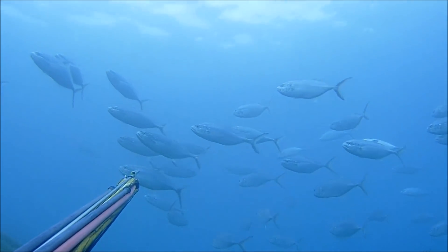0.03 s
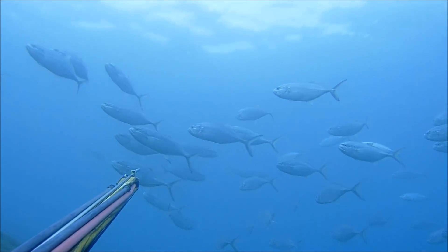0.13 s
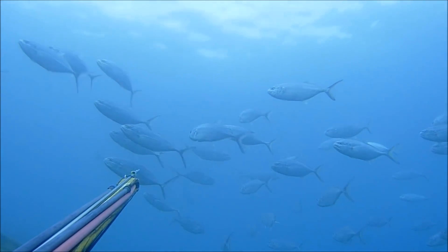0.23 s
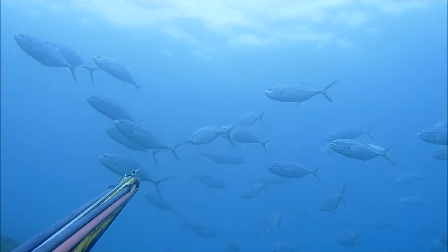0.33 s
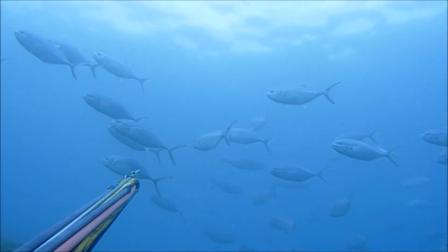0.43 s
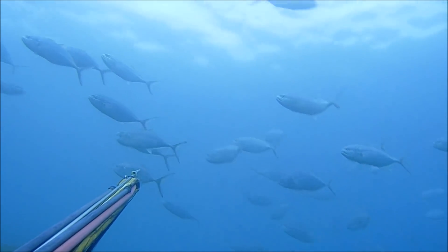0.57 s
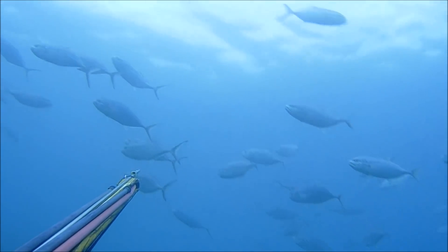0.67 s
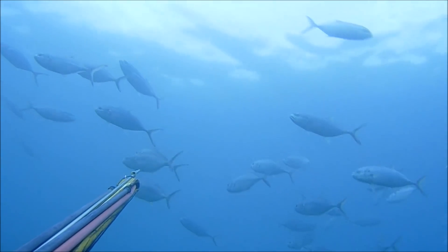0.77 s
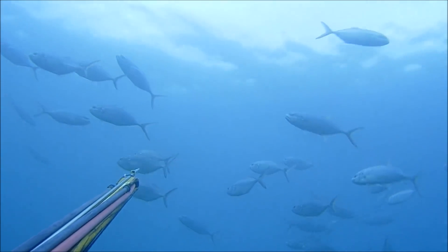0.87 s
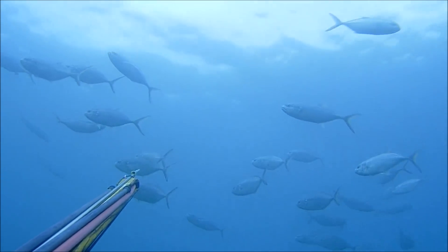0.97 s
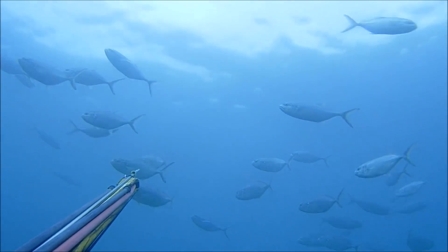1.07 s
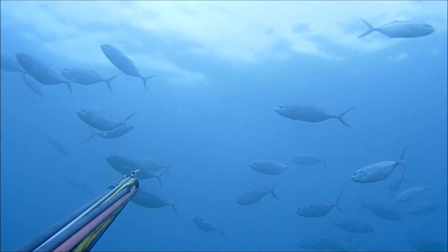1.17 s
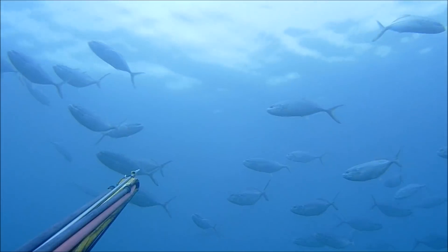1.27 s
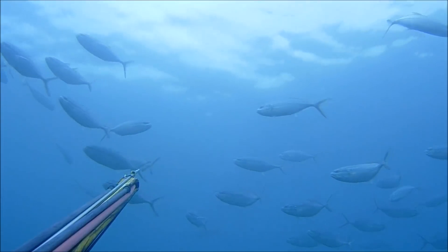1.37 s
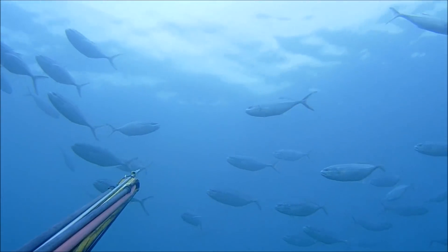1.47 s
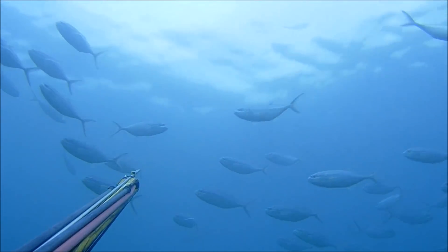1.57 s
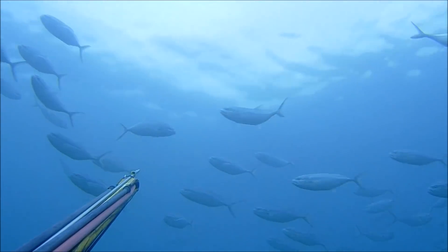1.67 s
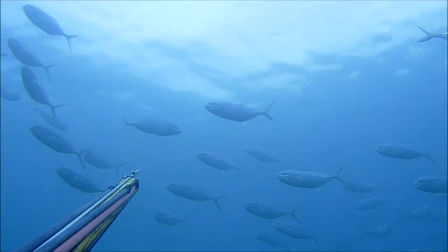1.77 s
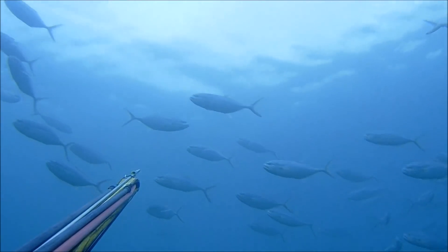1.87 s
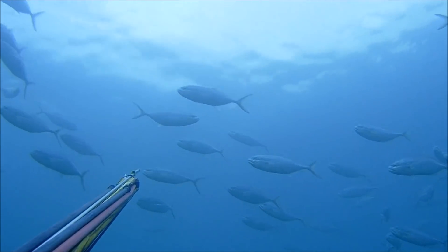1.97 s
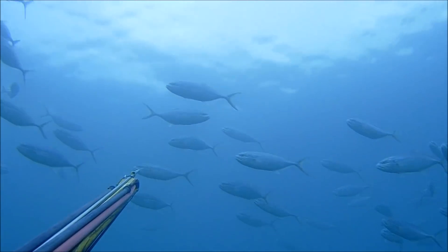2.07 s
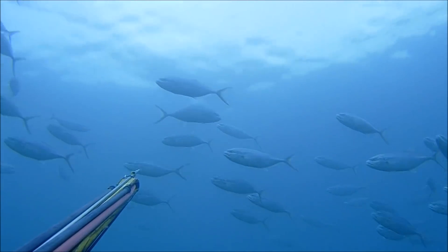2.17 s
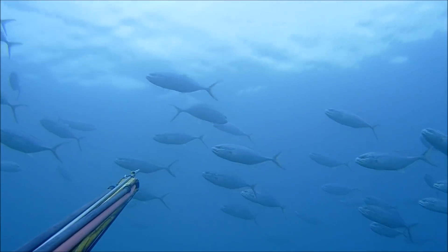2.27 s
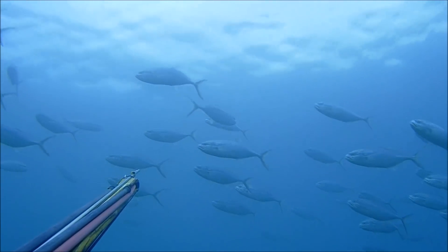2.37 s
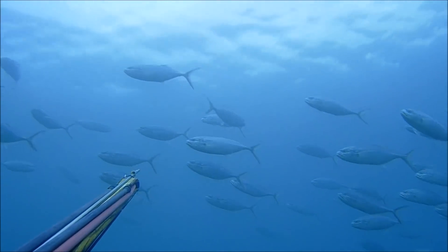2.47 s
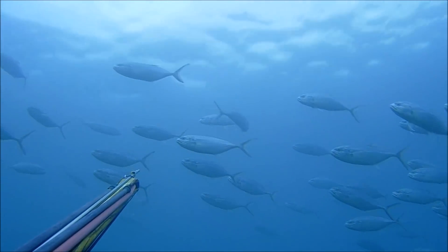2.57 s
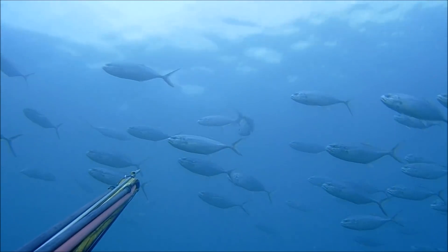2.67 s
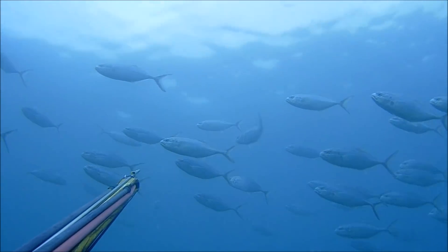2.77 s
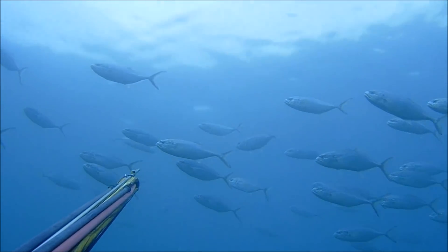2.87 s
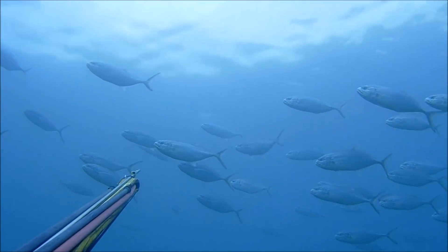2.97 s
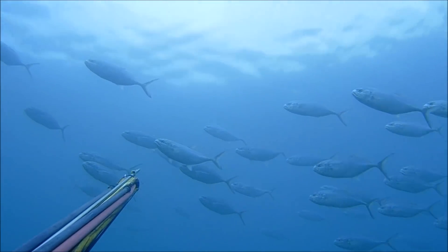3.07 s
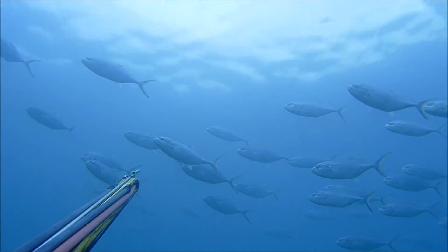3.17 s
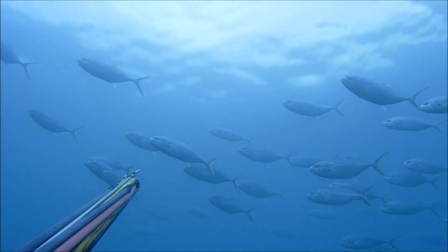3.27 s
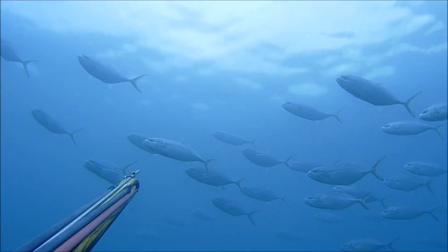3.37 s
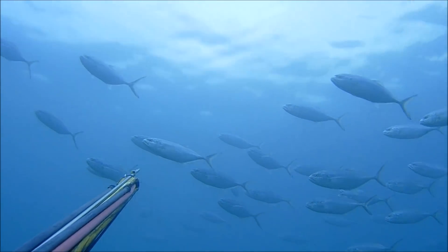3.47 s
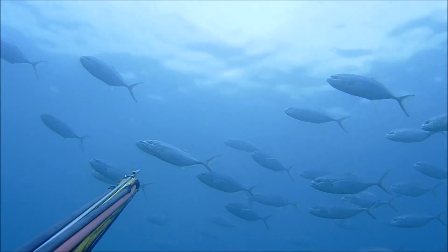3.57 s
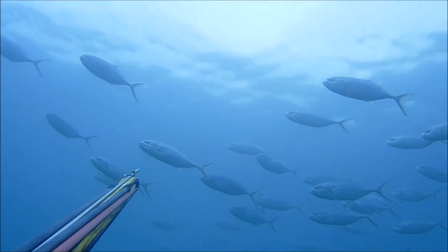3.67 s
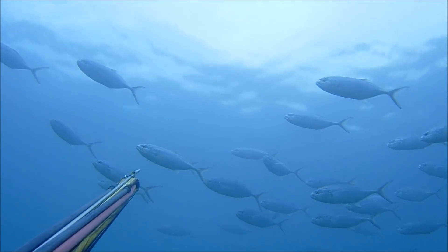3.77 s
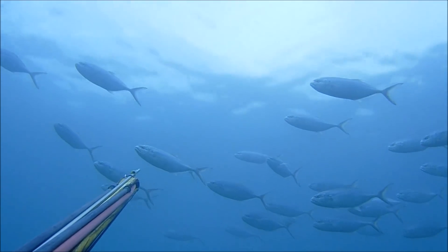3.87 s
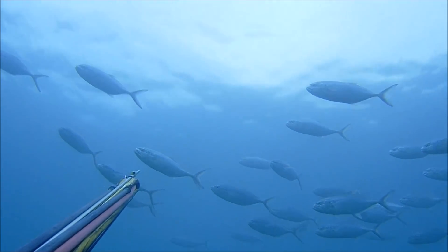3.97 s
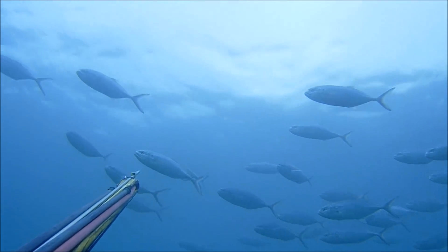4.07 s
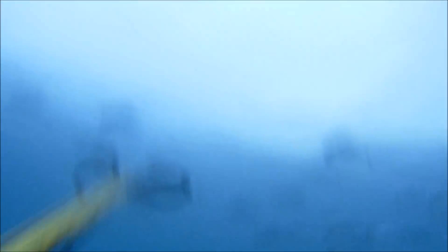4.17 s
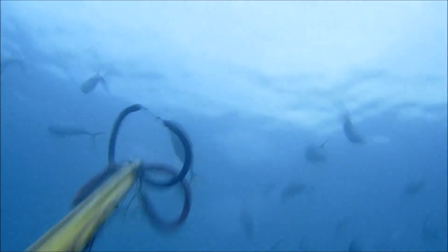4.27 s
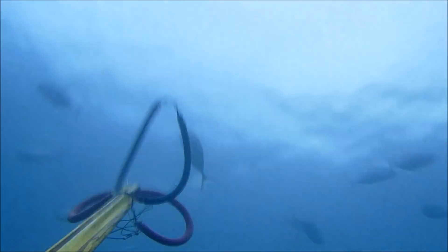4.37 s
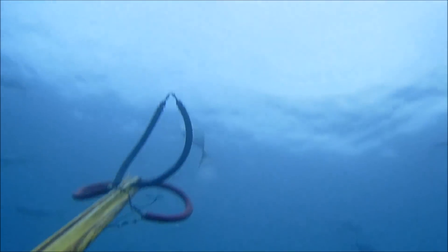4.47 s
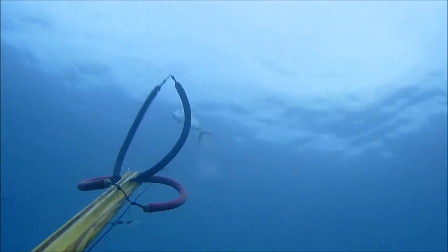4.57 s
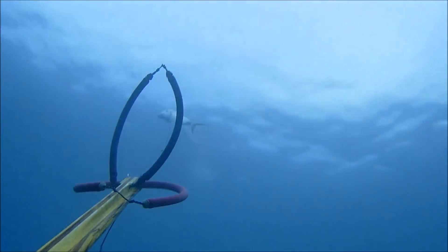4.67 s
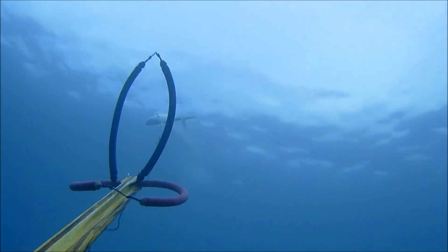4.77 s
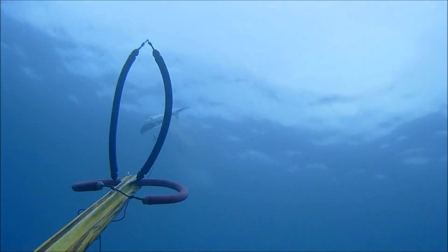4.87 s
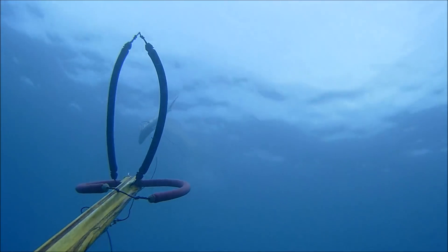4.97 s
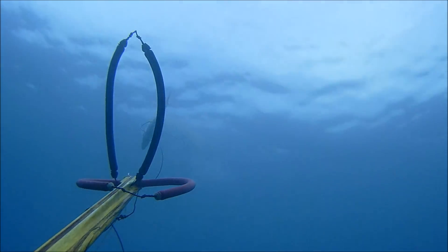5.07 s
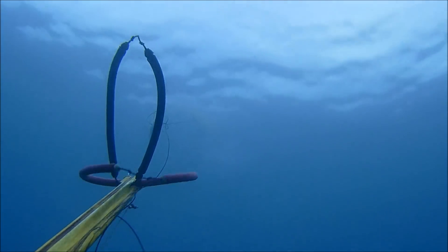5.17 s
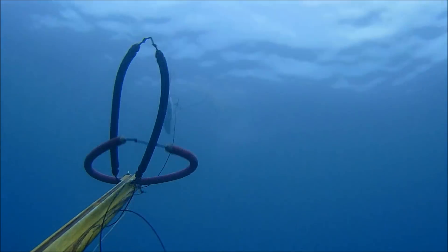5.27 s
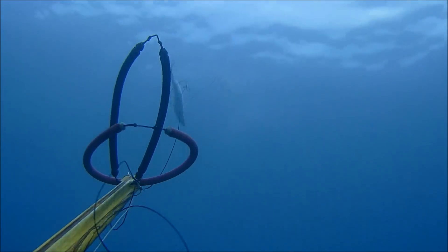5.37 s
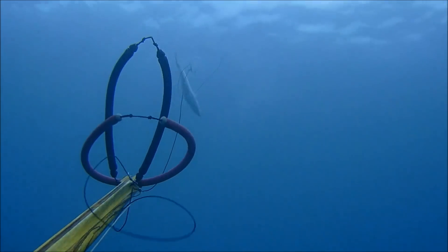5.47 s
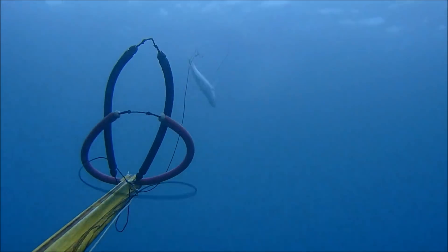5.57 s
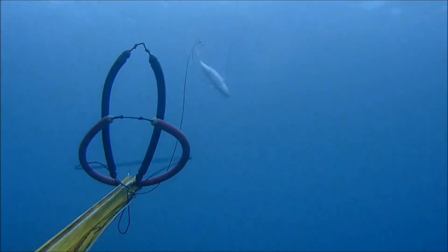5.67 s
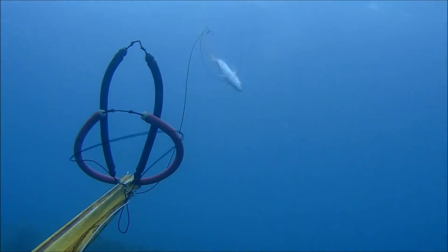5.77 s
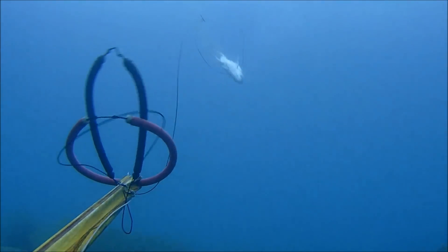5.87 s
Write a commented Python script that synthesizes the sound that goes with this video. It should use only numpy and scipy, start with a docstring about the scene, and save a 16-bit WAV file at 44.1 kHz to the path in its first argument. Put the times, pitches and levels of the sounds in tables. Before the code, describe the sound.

Underwater, a speargun fires with one sudden loud slap and a brief metallic scrape, amid soft sea wash and faint shrimp clicks.

```python
"""Under water, the microphone in a camera housing fixed to a band-powered speargun.
Sea wash and snapping shrimp are all around; close by, the hand and line knock lightly on the gun.
At 4.16 s it fires: rubber bands churn the water and slap the muzzle, overloading the microphone,
while the steel shaft scrapes out ringing. The gun wobbles on, knocking once a swing,
and the water settles back to wash, shrimp and a few handling knocks."""
import sys
import numpy as np
from scipy import signal
from scipy.fft import rfft, irfft
from scipy.io import wavfile
from scipy.ndimage import uniform_filter1d

SR = 44100
rng = np.random.default_rng(int(sys.argv[2]) if len(sys.argv) > 2 else 0)


def waveform_to_disk(signal):
    """Save audio, clipped to [-1, 1], as 16-bit WAV at the path in sys.argv[1]."""
    frames = np.transpose(np.atleast_2d(signal))
    scaled = np.clip(frames, -1, 1) * 32767
    samples = np.round(scaled).astype(np.int16)
    wavfile.write(sys.argv[1], SR, samples)


N = 261072
TIME = np.arange(N) / SR
HIT_TIME = TIME[:SR // 6]
SHOT_S, SWING_HZ = 4.16, 13.2
SHOT_AGE = np.maximum(TIME - SHOT_S, 0)


def amp(db):
    """Decibels to gain."""
    return 10 ** (np.asarray(db) / 20)


def unit(x):
    """Scale to rms 1."""
    return x / np.sqrt(np.mean(x ** 2))


def unit_hit(x):
    """Scale a hit to the energy of 1 ms at full level."""
    return x / np.sqrt(np.sum(x ** 2) * 1000 / SR)


def add(out, s, sound):
    """Mix a sound in at time s."""
    i = int(s * SR)
    out[i:i + len(sound)] += sound[:N - i]


def colour(x, points):
    """Filter by a spectrum of (f/Hz, level/dB) points; rms 1."""
    hz, db = np.transpose(points)
    f = np.maximum(np.fft.rfftfreq(len(x), 1 / SR), 1)
    gain = amp(np.interp(np.log(f), np.log(hz), db))
    return unit(irfft(rfft(x) * gain, len(x)))


def resonate(x, hz, width_hz):
    """Pass a sound through one resonance."""
    return signal.lfilter(*signal.iirpeak(hz, hz / width_hz, SR), x)


def walk(rate_hz):
    """A slow random drift with a spread near 1."""
    hold = int(SR / rate_hz)
    steps = np.repeat(rng.standard_normal(N // hold + 1), hold)
    return unit(uniform_filter1d(steps, hold))[:N]


def grains(per_s, spread_db=3):
    """Random tiny clicks, a few much larger than the rest."""
    size = amp(spread_db * np.minimum(rng.exponential(size=N), 4))
    return (rng.random(N) < per_s / SR) * size * rng.choice([-1, 1], N)


def fade(t60, age=HIT_TIME):
    """Exponential decay, 60 dB in t60 seconds."""
    return amp(-60 * age / t60)


def shot_envelope(attack_s, hold_s, fall_db_per_s):
    """From the shot on: a straight rise, a hold, then a steady fall in dB."""
    return np.minimum(SHOT_AGE / attack_s, 1) * amp(-fall_db_per_s * np.maximum(SHOT_AGE - hold_s, 0))


# Spectrum of the open water all around: f/Hz, relative level/dB
WASH_SPECTRUM = [(15, -8), (25, -1.5), (55, -19), (80, -13), (120, -13), (250, -12), (420, -14), (713, -17),
                 (1150, -22.5), (2000, -29), (3800, -33), (6120, -39), (10000, -40.5), (15800, -38.5)]
def sea(level_db=-52):
    """A dull wash that wavers slightly."""
    waver_db = .4 * walk(3) + .7 * walk(25)
    return amp(level_db) * colour(rng.standard_normal(N) * amp(waver_db), WASH_SPECTRUM)


# Upper resonances of the housing around the microphone: f/Hz, width/Hz, level/dB
HOUSING_RESONANCES = [(1460, 50, -1), (2130, 580, -2.5), (2566, 153, 4.5), (3060, 66, -1), (3526, 165, 2),
                      (3920, 247, -1), (4770, 150, -5.5), (5360, 140, -10.5), (6120, 210, -11.5)]
def bright(x):
    """Sharp clicks ring the housing's upper resonances."""
    return sum((-1) ** k * amp(db) * resonate(x, hz, width)
               for k, (hz, width, db) in enumerate(HOUSING_RESONANCES))


def crack(t60, tail_db, tail_t60):
    """A sharp burst and its scattered tail, heard through the housing."""
    decay = fade(t60) + amp(tail_db) * fade(tail_t60)
    return unit_hit(bright(rng.standard_normal(len(HIT_TIME)) * decay))


# Spectrum of a click's edge at the microphone: f/Hz, relative level/dB
TICK_SPECTRUM = [(300, -5), (1500, -0.5), (4000, -1.5), (7500, 7), (10000, 0), (16000, 0.5)]
def tick(t60=.02):
    """The broadband edge of a click."""
    return unit_hit(colour(rng.standard_normal(len(HIT_TIME)), TICK_SPECTRUM) * fade(t60))


# Swells in the distant crackle: peak t/s, half width/s, level/dB
CRACKLE_SWELLS = [(.45, 0.44, -58.5), (2.75, 0.093, -73), (5.2, 0.17, -62)]
def far_shrimp(rest_db=-69.5):
    """Countless snaps far off merge into a fine crackle."""
    clicks = grains(per_s=2000)
    swells = sum(amp(db) * np.exp(-((TIME - s) / width) ** 2) for s, width, db in CRACKLE_SWELLS)
    return (amp(rest_db) + swells) * (unit(bright(clicks)) + amp(-12.5) * unit(clicks))


def faint_snaps(count=8, level_db=-49, low_hz=2620, high_hz=4060):
    """Shrimp in the middle distance snap at random: rows of t/s, level/dB, f/Hz."""
    return [(when * TIME[-1], level_db + 3 * near, low_hz * (high_hz / low_hz) ** small)
            for when, near, small in rng.random((count, 3))]


# The shrimp nearest the microphone: t/s, ring level/dB, bubble f/Hz
NEAR_SNAPS = [(.2242, -43, 3530), (.67, -42, 2450), (0.8629, -27, 2350), (1.547, -34.5, 2430),
              (1.6693, -35, 2450), (1.8107, -45.5, 2380), (2.0417, -45, 4530), (2.1336, -46, 4100),
              (2.3423, -33, 2130), (2.394, -45.5, 5900), (2.6044, -33.5, 2430), (2.7383, -46.5, 2500),
              (2.798, -40, 2500), (2.8497, -46, 3700), (3.1143, -47.5, 3500), (3.478, -41.5, 4940),
              (3.683, -41.5, 3800), (4.103, -44, 3100), (5.483, -42.5, 3500)]
def near_shrimp():
    """Each snap is a collapsing bubble; a smaller, higher one has a sharper tick."""
    out = np.zeros(N)
    for s, db, hz in NEAR_SNAPS + faint_snaps():
        burst = crack(t60=.01, tail_db=-11, tail_t60=.085)
        ring = unit_hit(colour(burst, [(hz / 2, -7), (hz, 0), (1.72 * hz, -4), (2.6 * hz, -18)]))
        tick_db = -21 + 18.5 * np.log2(hz / 2400)
        add(out, s, amp(db) * (ring + amp(tick_db) * tick()))
    return out


# Dull modes of the housing around the microphone: f/Hz, relative level/dB, t60/s
HOUSING_MODES = [(328, -22.5, 0.048), (432, 5.5, 0.022), (592.5, 4.5, 0.026), (699.6, 1, 0.04),
                 (814, -0.5, 0.022), (1049, -16.5, 0.064), (1382, -0.5, 0.024), (1490, -4, 0.023),
                 (1664, -4.5, 0.021)]
def thud(tilt_db_per_octave, contact_s=.00029, push=.92, push_s=.00043):
    """One blow pushes the housing and rings its low modes."""
    hz, db, t60 = np.transpose(HOUSING_MODES)
    scatter_db, detune = rng.normal(0, 1.5, len(hz)), rng.normal(1, .01, len(hz))
    gain = amp(db + tilt_db_per_octave * np.log2(hz / hz[0]) + scatter_db)
    sign = (-1) ** (np.arange(len(hz)) // 2)
    ring = sum(g * fade(d) * np.sin(2 * np.pi * f * HIT_TIME)
               for g, f, d in zip(sign * gain, hz * detune, t60))
    push_time = HIT_TIME / push_s - 2
    shove = -push_time * np.exp(-push_time ** 2 / 2)  # one swing of pressure
    return unit_hit(ring * (1 - np.exp(-HIT_TIME / contact_s)) + push * shove)


def strikes(rows, tick_db, crack_t60, tilt_db):
    """Blows carry through the gun to the housing; hardness (crack over thud) also brightens the thud."""
    out = np.zeros(N)
    for s, db, hardness_db in rows:
        edge = crack(crack_t60, tail_db=-47, tail_t60=.14) + amp(tick_db) * tick()
        body = thud(tilt_db + .37 * hardness_db)
        add(out, s, amp(db) * (body + amp(hardness_db) * edge))
    return out


# Light contacts on the gun, close to the microphone: t/s, level/dB, hardness/dB
HANDLING_KNOCKS = [(.9115, -38.5, -10), (.9428, -36.5, -28), (1.0905, -33, -26), (1.5335, -34, -11),
                   (1.5415, -38, -1), (1.939, -29.5, -33), (3.519, -33.5, -33), (3.788, -29, -28.5),
                   (4.986, -39.5, -24), (5.337, -42, -23), (5.396, -42, -7), (5.869, -41, 2)]
def handling(ring_db=3):
    """The hand shifts on the grip and the line taps the gun; the grip's hollow sings on."""
    knocks = strikes(HANDLING_KNOCKS, tick_db=-28, crack_t60=.025, tilt_db=9)
    return knocks + amp(ring_db) * resonate(knocks, hz=715, width_hz=70)


# Knocks of the gun that carries the microphone, one a swing: level/dB
SWING_KNOCKS_DB = [-14.5, -18.5, -15, -30.5, -25]
def wobble(start_s=4.4305, backswing_s=.0395):
    """The swinging gun knocks once a swing, ever duller, and bumps on the way back."""
    age = np.arange(len(SWING_KNOCKS_DB)) / SWING_HZ
    hardness_db = -19.5 - 45 * age
    knocks = zip(start_s + age, SWING_KNOCKS_DB, hardness_db)
    bumps = zip(start_s + age + backswing_s, -26.5 - 61 * age, hardness_db)
    forth = strikes(knocks, tick_db=-19, crack_t60=.013, tilt_db=12)
    back = strikes(bumps, tick_db=-23, crack_t60=.011, tilt_db=-1.5)
    return forth + back


def recoil(swing_db=-15, kick_db=-10, kick_s=4.227, kick_width_s=.008):
    """The gun swings against the water; the bands reaching the muzzle give it one deep kick."""
    swing = np.sin(2 * np.pi * SWING_HZ * SHOT_AGE) * fade(t60=1, age=SHOT_AGE)
    kick = np.exp(-((TIME - kick_s) / kick_width_s) ** 2)
    return -amp(swing_db) * swing - amp(kick_db) * kick


# Low modes of the rubber bands, close up: f/Hz, level/dB, t60/s
BAND_MODES = [(110, -20, .9), (150, -25, .45), (203, -26, .7)]
def twang(attack_s=.0023):
    """The slack bands vibrate, their pitch wandering as they flail."""
    out = np.zeros(N)
    for hz, db, t60 in BAND_MODES:
        phase = 2 * np.pi * np.cumsum(hz * (1 + .07 * walk(35))) / SR
        out += amp(db + 3 * walk(30)) * fade(t60, SHOT_AGE) * np.sin(phase)
    return out * (1 - np.exp(-SHOT_AGE / attack_s))


# Spectra of the eddies and the gurgle right by the housing: f/Hz, relative level/dB
EDDY_SPECTRUM = [(15, -11), (45, 3), (75, -8.5), (115, 1.5), (160, -8), (200, -2), (250, -9.5), (400, -13),
                 (900, -58)]
GURGLE_SPECTRUM = [(130, -63.5), (260, -6.5), (420, 10), (520, 3), (720, 11.5), (900, -26), (1500, -1),
                   (3000, -63)]
def wake():
    """The whipping bands shed eddies that rumble and gurgle away, over a gentler stir around the gun."""
    age = TIME - SHOT_S
    stir = amp(-46.5 + np.minimum(202 * age, -14 * age))  # rises as the hand tightens, settles slowly
    eddy = amp(-8.5) * shot_envelope(attack_s=.0039, hold_s=.032, fall_db_per_s=123.5)
    gurgle = amp(-11.5) * shot_envelope(attack_s=.0042, hold_s=.072, fall_db_per_s=190)
    return ((eddy + stir) * colour(rng.standard_normal(N), EDDY_SPECTRUM)
            + (gurgle + amp(-3.5) * stir) * colour(rng.standard_normal(N), GURGLE_SPECTRUM))


# The steel shaft's modes and scrape spectrum, heading away from the microphone: f/Hz, relative level/dB
SHAFT_MODES = [(695, -0.5), (1041, -10), (1585, -23), (2085, -14), (2610, -15), (2825, -18.5), (3558, -11),
               (4630, -36), (5700, -33), (6430, -35)]
SCRAPE_SPECTRUM = [(150, 7.5), (450, -21), (720, -12), (950, 5), (1550, -1.5), (1900, -3.5), (3500, -15),
                   (4500, -18.5), (8000, -32.5), (16000, -68)]
def shaft(track_s=.048, line_out_s=.157):
    """The spear chatters along its track, which keeps the steel ringing; the line scrapes out after it."""
    sag = shot_envelope(attack_s=.0013, hold_s=0, fall_db_per_s=87)
    scrape = amp(-12.5) * sag * shot_envelope(attack_s=.001, hold_s=line_out_s, fall_db_per_s=900)
    # The ring grows with speed, drops as the shaft leaves the track and lingers faintly in flight.
    speed = np.minimum(SHOT_AGE / track_s, 1)
    flown_s = np.maximum(SHOT_AGE - track_s, 0)
    ring = speed ** 1.44 * (amp(-8.5 - 1598.5 * flown_s) + amp(-38 - 166 * flown_s))
    chatter = grains(per_s=3000)
    tones = np.zeros(N)
    for hz, db in SHAFT_MODES:
        phase = 2 * np.pi * np.cumsum(hz * (1 + .004 * walk(70))) / SR
        tones += amp(db + 2.5 * walk(45)) * np.sin(phase)
    return scrape * colour(chatter, SCRAPE_SPECTRUM) + ring * unit(tones)


def overload(x, ceiling, hardness=6):
    """Loud pressure swings flatten into square tops."""
    return x / (1 + np.abs(x / ceiling) ** hardness) ** (1 / hardness)


# The release, then bands, wishbones and line hitting the gun, close up: t/s, level/dB, hardness/dB
SHOT_BLOWS = [(4.1598, 18.5, -10), (4.1645, 0, -2), (4.1702, 14.5, -9.5), (4.178, 12, -12),
              (4.194, -7, -2.5), (4.2305, -4.5, -5.5), (4.2355, 8.5, -23), (4.2455, -9, -7),
              (4.2672, -6, -11), (4.2712, -4.5, -12.5), (4.2805, -2.5, -22), (4.2925, -6.5, -12),
              (4.2942, -8.5, -1), (4.3065, 9, -18.5), (4.3115, -13, -2), (4.331, -10, -14.5),
              (4.351, -5.5, -22), (4.364, -43, 7), (4.3812, 4, -23.5), (4.3875, -11.5, -14),
              (4.3988, -15.5, -18.5)]
def shot():
    """Blows, churned water, twang and recoil together overload the microphone."""
    blows = strikes(SHOT_BLOWS, tick_db=-7.5, crack_t60=.0054, tilt_db=9)
    return overload(blows + wake() + twang() + recoil(), ceiling=.41)


def scene():
    """One microphone on the gun: the gun itself close up, shrimp and sea beyond."""
    gun = shot() + handling() + shaft() + wobble()
    return (gun + far_shrimp() + near_shrimp() + sea())[None]


def record(dry, dull_hz=11500, drift_hz=6, top_hz=16000):
    """The sealed housing dulls the treble; the recorder blocks drift, rounds peaks and cuts the top."""
    dull = signal.sosfilt(signal.butter(2, dull_hz, fs=SR, output="sos"), dry)
    centred = signal.sosfilt(signal.butter(1, drift_hz, "high", fs=SR, output="sos"), dull)
    rounded = overload(centred, ceiling=.9)
    return signal.fftconvolve(rounded, signal.firwin(101, top_hz, fs=SR)[None], "same")


dry = scene()
out = record(dry)
waveform_to_disk(out)
```